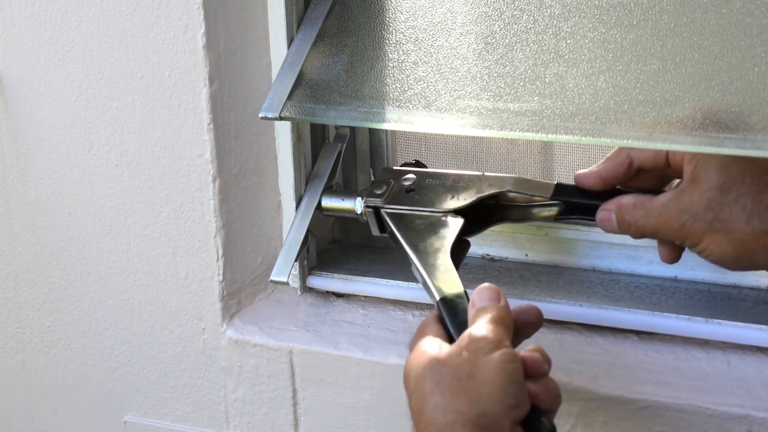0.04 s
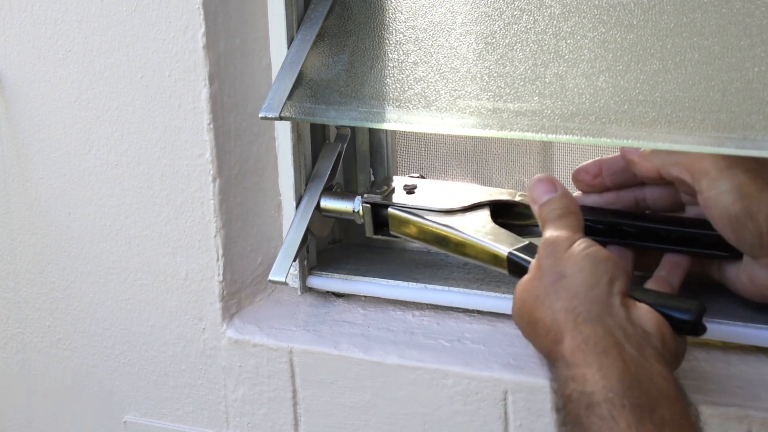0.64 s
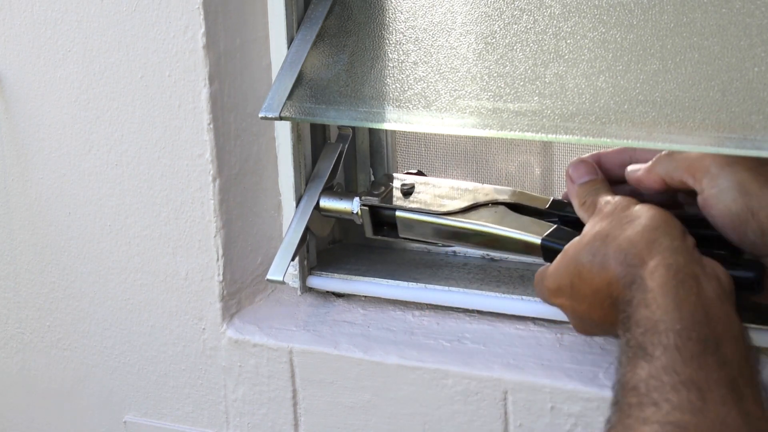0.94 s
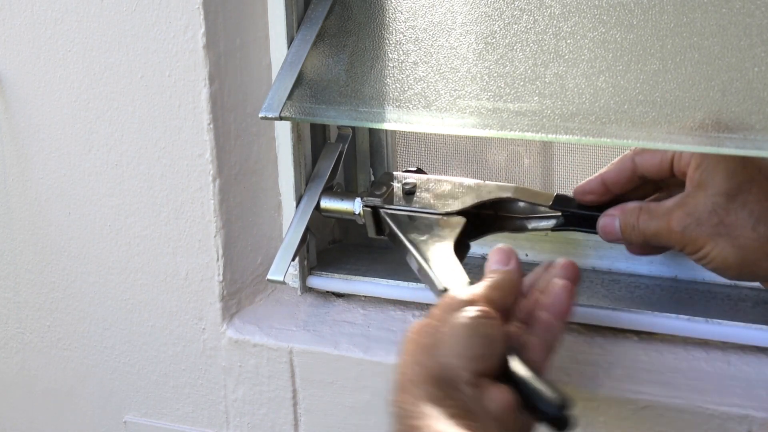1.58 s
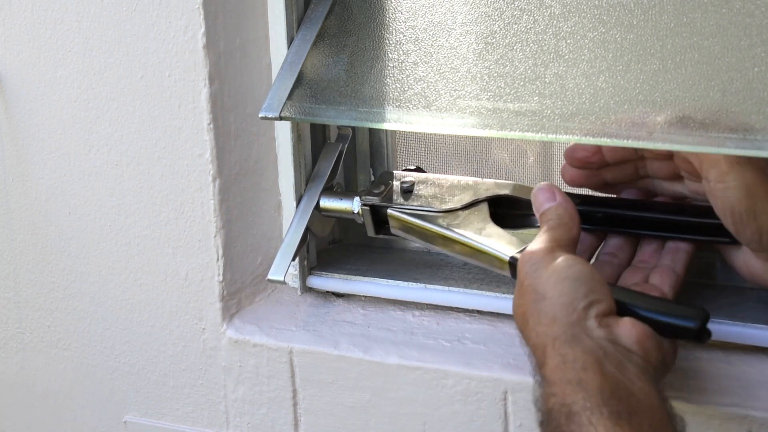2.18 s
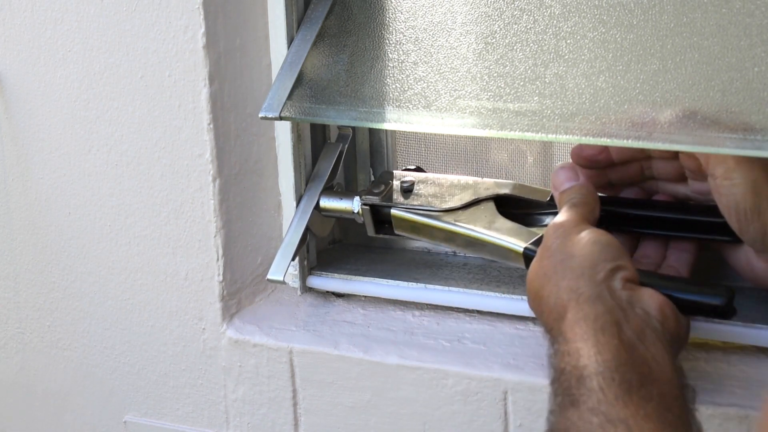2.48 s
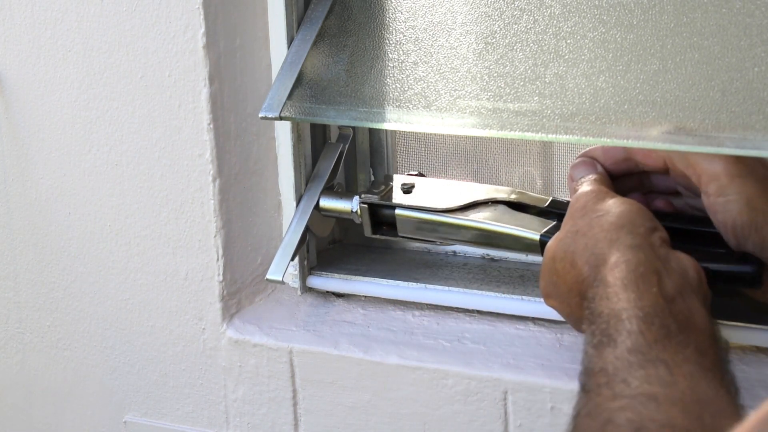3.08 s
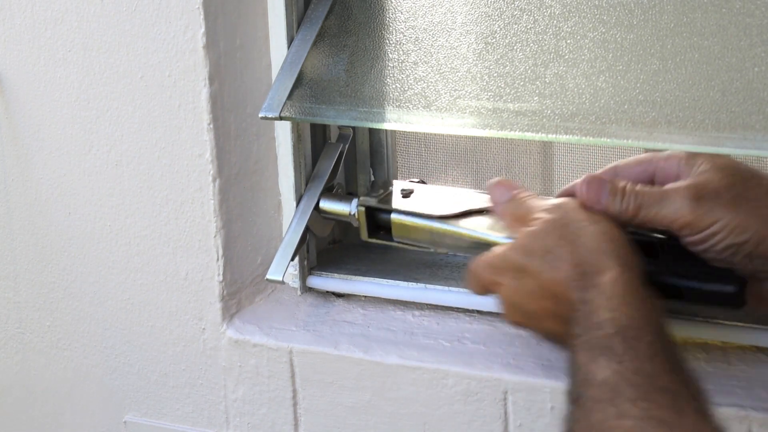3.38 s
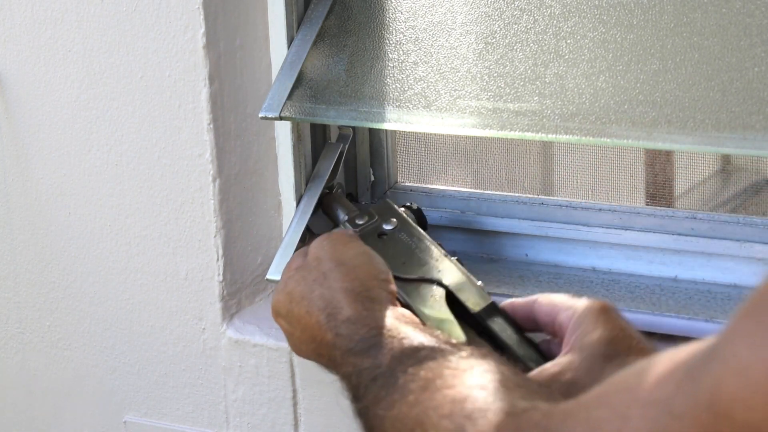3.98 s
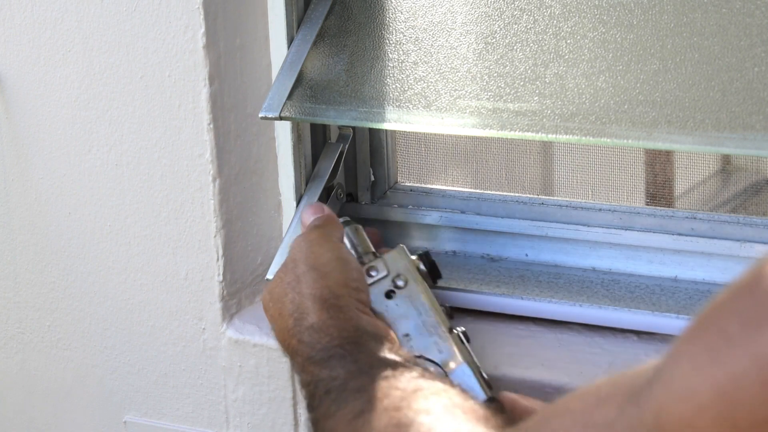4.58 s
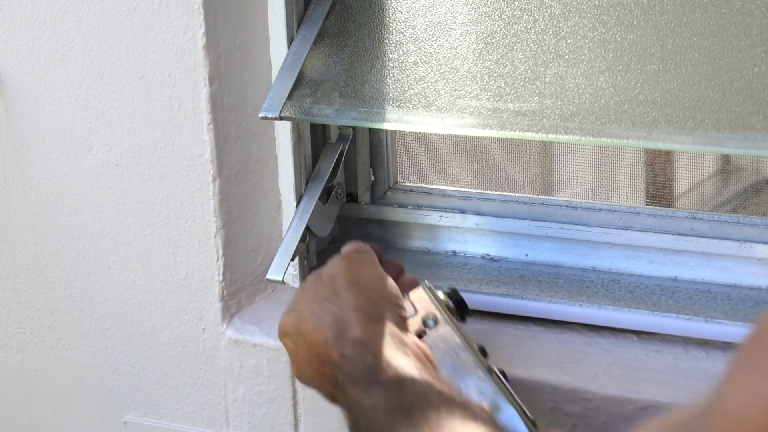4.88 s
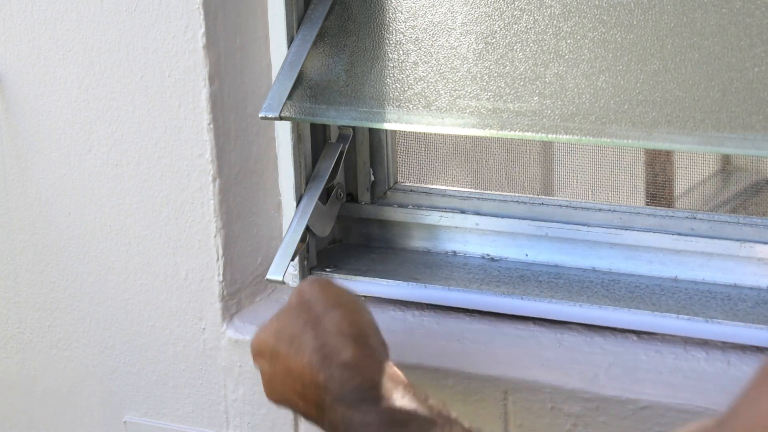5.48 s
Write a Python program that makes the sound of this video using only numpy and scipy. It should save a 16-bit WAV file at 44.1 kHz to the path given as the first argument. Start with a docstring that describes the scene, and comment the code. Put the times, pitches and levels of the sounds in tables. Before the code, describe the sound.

A hand rivet tool clicks and snaps loudly against an aluminium window frame, then scrapes and rattles away over faint traffic.

```python
"""A small hard room with an aluminium louvre window; distant traffic hums outside.
Close up, a hand rivet tool is pumped twice against the window, its steel jaws and handles clicking.
The mandrel snaps with a bang that rings the frame and overloads the microphone, then the tool is
drawn off, scraping and rattling. Near the end an engine swells and a faint whistle sounds far away."""
import sys
import numpy as np
from scipy import signal
from scipy.fft import rfft, irfft
from scipy.io import wavfile
from scipy.ndimage import uniform_filter1d

SR = 44100
rng = np.random.default_rng(int(sys.argv[2]) if len(sys.argv) > 2 else 0)


def put_to_file(sound):
    """Save the sound as 16-bit audio at rate SR, in the file named by the first command-line argument."""
    columns = np.atleast_2d(sound).T  # one column per channel
    safe = np.clip(columns, -1, 1)
    whole_steps = np.round(safe * 32767)
    wavfile.write(sys.argv[1], SR, whole_steps.astype(np.int16))


N = 253021
TAPS = 4096  # length of the colouring filters
BINS = np.fft.rfftfreq(TAPS, 1 / SR)


def amp(db):
    """Decibels to gain."""
    return 10 ** (np.asarray(db) / 20)


def unit(x):
    """Scales to rms 1."""
    return x / np.sqrt(np.mean(x ** 2) + 1e-20)


def curve_at(points, hz):
    """Reads a table on a log-frequency axis."""
    f, value = np.transpose(points)
    return np.interp(np.log(hz + 1), np.log(f + 1), value)


def add(mix, start_s, sound):
    """Drops a sound into the mix."""
    part = mix[:, max(round(start_s * SR), 0):][:, :sound.shape[-1]]
    part += sound[..., :part.shape[-1]]


def equalised(x, points):
    """EQs a whole track by a table of dB."""
    return irfft(rfft(x) * amp(curve_at(points, np.fft.rfftfreq(N, 1 / SR))), N)


def coloured(x, db):
    """Minimum-phase EQ: resonances ring after the blow, never before."""
    log_gain = np.log(amp(np.maximum(db, -100)))
    mirrored = np.r_[log_gain, log_gain[-2:0:-1]]
    taps = np.fft.ifft(np.exp(np.conj(signal.hilbert(mirrored)))).real
    return signal.fftconvolve(x, taps[None], axes=1)


def drift(rate_hz):
    """A slow random wobble of rms 1."""
    hz = np.fft.rfftfreq(N, 1 / SR)
    return unit(irfft(rfft(rng.standard_normal(N)) * np.exp(-(hz / rate_hz) ** 2), N))


# The rumble of far roads. Each row: frequency in Hz, relative level in dB.
TRAFFIC_EQ = [(15, -50), (27, -23), (42, -2.5), (64, -11), (88, 0), (132, -6.5), (165, -2), (220, -1),
              (280, -9.5), (450, -15.5), (620, -16.5), (860, -10), (1600, -13.5), (2500, -24),
              (4470, -35.5), (9000, -45.5), (15900, -51.5)]
# Its stereo spread. Each row: frequency in Hz, side against mid in dB.
TRAFFIC_WIDTH = [(60, -20.5), (110, -25.5), (200, -32), (380, -25), (700, -24), (1290, -19.5), (2380, -14),
                 (4400, -9), (8120, -13.5), (15000, -21)]


def traffic(start_db=-40, sink_db=4, sink_s=2.2, flutter_db=.5):
    """A wash of road noise that sinks as the traffic draws away, as mid and side."""
    t = np.arange(N) / SR
    level_db = start_db - sink_db * (1 - np.exp(-t / sink_s)) + flutter_db * drift(10.3)
    wash = unit(equalised(rng.standard_normal((2, N)), TRAFFIC_EQ)) * amp(level_db)
    return widened(wash, TRAFFIC_WIDTH)


def engine(firing_hz=97.8, idle_db=-51, waver=.015, throb_db=3, surge_s=4.92, surge_width_s=.26):
    """A distant engine idles, wavering around its firing rate, and grows louder for a moment."""
    t = np.arange(N) / SR
    cycles = firing_hz * np.cumsum(1 + waver * drift(6)) / SR
    hum = sum(amp(db + throb_db * drift(9.2)) * np.sin(2 * np.pi * order * cycles)
              for order, db in ((.5, -7), (1, .004), (2, -7)))
    surge_db = 7.5 * np.exp(-((t - surge_s) / surge_width_s) ** 2)
    return amp(idle_db + surge_db) * hum


def whistle(start_s=5.28, length_s=.3, hz=4910, level_db=-73, flicker_db=3, ramp_s=.04):
    """A thin, flickering tone far off swells and fades once."""
    t = np.arange(N) / SR - start_s
    swell = np.clip(np.minimum(t, length_s - t) / ramp_s, 0, 1)
    return swell * amp(level_db + flicker_db * drift(25)) * np.sin(2 * np.pi * hz * t)


# The hard room's reverb. Each row: frequency in Hz, seconds to fall 60 dB.
ROOM_T60 = [(150, 0.18), (500, 0.5), (1500, 0.47), (3000, 0.48), (5500, 0.48), (8000, 0.45816),
            (12000, 0.34), (16000, 0.22)]


def room_decay(recess_db, recess_t60=.105):
    """Gain over frequency and time: the window recess dies fast, the room behind it slowly."""
    hz, t, _ = signal.stft(np.zeros(SR // 2), SR, nperseg=256)
    room = amp(-60 * t / curve_at(ROOM_T60, hz)[:, None])
    recess = amp(recess_db - 60 * t / recess_t60)
    return np.hypot(room, recess)


def reflections(decay, build_s=.0024):
    """A fresh tail of dense wall reflections, as mid and side."""
    spectrogram = signal.stft(rng.standard_normal((2, SR // 2)), SR, nperseg=256)[2]
    tail = signal.istft(spectrogram * decay, SR, nperseg=256)[1]
    tail *= 1 - np.exp(-np.arange(tail.shape[1]) / SR / build_s)
    return tail / np.linalg.norm(tail[0])


# Stereo spread of the tool in the room. Each row: frequency in Hz, side gain in dB.
TOOL_WIDTH = [(100, -28), (1200, -34.5), (2200, -25.5), (3300, -18), (5000, -14), (7000, -5.5),
              (8200, -6.5), (10000, -11.5), (14000, -6.5)]


def widened(x, width=TOOL_WIDTH):
    """Sets the side against the mid, band by band."""
    return np.array([x[0], equalised(x[1], width)])


# The aluminium frame with the tool on it.
# Each row: pitch in Hz, relative level in dB, seconds to fall 60 dB.
FRAME_MODES = [(404, -10.5, 0.496), (1550, 1, 0.59), (1466, 3, .4), (1530, 1, 0.26), (1650, -6.5, 0.56),
               (1850, -7.5, 0.507), (2050, -4, 0.5), (2150, -7.5, .3), (2260, -6.5, 0.29), (2080, -9, 0.26),
               (2410, -3, .38), (2680, -8, .55), (2673.4, -4, 0.45), (2750, -0.5, 0.324),
               (3095, -2.5, 0.31), (3352, -5, .3), (3370, -2.5, .42), (3700, -5.5, 0.26), (4170, -1, 0.33),
               (5360, -4.5, .3), (5530, -3, .3), (5950, 6.5, 0.2303), (6200, -5, 0.22), (9300, -7, 0.27),
               (9160, 0, 0.237), (12067, -1.5, 0.18)]


def frame_ring(length_s=.5, attack_s=.001):
    """The frame's modes ring down after one blow, as mid and side."""
    t = np.arange(round(length_s * SR)) / SR
    phases = rng.uniform(0, 2 * np.pi, (len(FRAME_MODES), 2, 1))
    modes = sum(amp(db - 60 * t / t60) * np.sin(2 * np.pi * hz * t + phase)
                for (hz, db, t60), phase in zip(FRAME_MODES, phases))
    return modes * (1 - np.exp(-t / attack_s))


def tilt(db_per_octave):
    """A slope in dB, pivoting at 3 kHz: harder contacts are brighter."""
    return db_per_octave * np.log2(np.maximum(BINS, 800) / 3000)


def mode_ripple(spacing_hz=110):
    """Uneven peaks and dips of rms 1, from the steel's many close modes."""
    knots = np.arange(0, SR / 2, spacing_hz)
    heights = rng.uniform(-.89, 1, TAPS)[:len(knots)]
    return unit(np.interp(BINS, knots, heights))


def blow(decay_s, rise_share=.237):
    """A noise burst for dense, quickly damped metal modes; mid and side each have energy 1."""
    t = np.arange(TAPS // 2) / SR
    spectrum = rfft(rng.standard_normal((2, TAPS)))
    spectrum /= np.sqrt(uniform_filter1d(abs(spectrum) ** 2, size=40, axis=1))  # feed all bands alike
    envelope = np.exp(-t / decay_s) * (1 - np.exp(-t / (rise_share * decay_s)))
    burst = irfft(spectrum)[:, :len(t)] * envelope
    return burst / np.linalg.norm(burst, axis=1, keepdims=True)


def metal_hits(rows, eq, peak_width_share, recess_db, ripple_db, ping_db, ping_t60=.057):
    """Direct sound and reflections of metal striking metal; each hit favours one resonance."""
    direct, reflected = np.zeros((2, N)), np.zeros((2, N))
    decay = room_decay(recess_db)
    body_db = curve_at(eq, BINS) + ripple_db * mode_ripple()
    t = np.arange(TAPS) / SR
    for start_s, level_db, hz, peak_db, brightness, decay_s in rows:
        excess = max(amp(peak_db) ** 2 - 1, 0)
        resonance = 1 + excess / (1 + ((BINS - hz) / (peak_width_share * hz)) ** 2)
        # the more a hit rings on one note, the softer its top
        cutoff_hz = max(17500 * 2 ** (-.08 * peak_db), 1.5 * hz)
        rolloff = 1 + (BINS / cutoff_hz) ** 8
        colour_db = body_db + tilt(brightness) + 10 * np.log10(resonance / rolloff)
        # the level is the blow's energy spread over 10 ms
        gain = amp(level_db) * np.sqrt(SR / 100 / np.mean(amp(colour_db) ** 2))
        add(direct, start_s, gain * coloured(blow(decay_s), colour_db))
        add(reflected, start_s, gain * coloured(reflections(decay), colour_db))
        # the favoured mode rings on as a short, centred ping
        ping = amp(level_db + ping_db - 60 * t / ping_t60) * np.sin(2 * np.pi * hz * t)
        add(direct[:1], start_s, np.sqrt(excess / (excess + 20)) * ping)
    return direct, reflected


# The steel tool's tone, in scrapes and clicks alike. Each row: frequency in Hz, gain in dB.
STEEL_EQ = [(100, -6), (500, -10.5), (1000, 0), (1600, 7), (2200, 4.5), (3000, 0.5), (3550, 1), (4200, -5),
            (5000, -7.5), (6000, -9), (8500, -9), (11500, -13), (15500, -15)]
# Steel sliding on metal.
# Each row: start in seconds, length in seconds, level in dB, brightness in dB per octave.
SCRAPE_STROKES = [(0.205, 0.026, -52.5, 0.5), (1.18, 0.035, -55.5, -1), (1.358, 0.087, -55, -2),
                  (2.42, 0.024, -58, -0.5), (3.641, .03, -48.5, -3.5), (3.74, 0.13, -50, -4),
                  (3.875, 0.054, -52, 1), (4.281, 0.066, -61, -2), (4.376, 0.03, -54, -1.5),
                  (4.561, 0.21, -64.5, 2), (5.039, 0.067, -59.5, -0.5)]


def tool_scrapes(slips_per_s=1100, room_db=-4):
    """The tool slides in many tiny slips, each stroke swelling and fading."""
    direct = np.zeros((2, N))
    for start_s, length_s, level_db, brightness in SCRAPE_STROKES:
        n = round(length_s * SR)
        slips = rng.standard_normal((2, n)) * (rng.random(n) < slips_per_s / SR) * np.hanning(n)
        stroke = coloured(slips, curve_at(STEEL_EQ, BINS) + tilt(brightness))[:, :n]
        add(direct, start_s, amp(level_db) * unit(stroke))
    reflected = signal.fftconvolve(direct, reflections(room_decay(recess_db=-9)), axes=1)[:, :N]
    return widened(direct + amp(room_db) * reflected)


# Knocks inside the tool. Each row: start in seconds, level in dB, resonance in Hz,
# its peak in dB, brightness in dB per octave, decay time in seconds.
TOOL_KNOCKS = [(0.006, -46, 3260, 15, 1, 0.0024), (0.263, -36.5, 3520, 8, -0.5, 0.0037),
               (0.9649, -32.5, 2200, 12, 2, .004), (0.9668, -37, 5200, 8, -1, 0.016),
               (1.203, -47.5, 6630, 9, -1, .006), (1.369, -34, 3480, 14, -1, 0.0022),
               (1.3965, -45, 3213, 6, -1, .0037), (1.405, -31, 1300, 11, -6, .004),
               (1.4205, -28, 1810, 1, -2, .0018), (1.422, -44.5, 14670, 12, 4, .0013),
               (1.427, -36.5, 2160, 10, -3.5, 0.006), (1.499, -46, 2500, 3, -3, 0.0022),
               (1.652, -53, 3760, 14, 2.5, .002), (1.7021, -37, 7500, 6.5, 0, 0.0043),
               (1.713, -35.5, 10750, 4, -0.5, 0.0022), (1.954, -44.5, 3040, 2, -8, 0.0037),
               (3.6563, -42.5, 3020, 6, -3, .008), (3.9083, -39, 6650, 9, .5, 0.009),
               (3.9125, -36, 1150, 7, 1.5, .004), (3.9199, -37.5, 7100, 12, -.5, 0.013),
               (4.095, -50, 2490, 2, -3, .004), (4.495, -41, 12400, -2, 7, 0.0015),
               (4.5727, -45, 3009, 6, 6, 0.0018), (4.6144, -52.5, 12000, 2, 5, .002)]


def tool_clicks(ring_db=-32, room_db=-2.5, side_db=-4):
    """Jaws, pivot and handles knock; bright knocks stir the frame less than dull ones."""
    direct, reflected = metal_hits(TOOL_KNOCKS, STEEL_EQ, peak_width_share=.074,
                                   recess_db=12, ripple_db=3.5, ping_db=4)
    ring = frame_ring()
    for start_s, level_db, _, _, brightness, _ in TOOL_KNOCKS:
        add(direct, start_s, amp(level_db + ring_db - 2 * max(brightness, 0)) * ring)
    mid, side = widened(direct + amp(room_db) * reflected)
    return np.array([mid, amp(side_db) * side])


# The mandrel breaks in stages, then the jaws slam back. Each row: start in seconds, level in dB,
# resonance in Hz, its peak in dB, brightness in dB per octave, decay time in seconds.
SNAP_HITS = [(3.0663, -14.5, 700, 14, 0, 0.0017), (3.0689, -7.5, 2224, 3.5, 0, 0.00387),
             (3.0722, -10, 3380, 4, 0.5, .005), (3.0810, -17.5, 4500, 3.5, 1, .005),
             (3.0875, -15, 9600, 10, 2.5, .006)]
# The tone of the break. Each row: frequency in Hz, gain in dB.
SNAP_EQ = [(60, -18), (270, -9.5), (480, -16.5), (750, -10), (1200, -10), (1520, 2), (2000, -9.5),
           (2290, 4.5), (2600, -5.5), (3400, -2), (4300, -8), (7000, -9.5), (8000, -19.5), (15500, -13.5)]
# The bang spreads much wider than the clicks. Each row: frequency in Hz, side gain in dB.
SNAP_WIDTH = [(50, 2.5), (200, -10.5), (450, -8), (900, -8.5), (2200, -17.5), (3300, -11), (5000, -11.5),
              (6000, -4), (8200, 10), (10000, -1.5), (12000, -4), (14500, -9.5)]


def mandrel_snap(ring_db=-28.5, room_db=-9, kick_s=3.0676, kick_hz=250, kick_db=-6, kick_decay_s=.0017):
    """The mandrel breaks; the freed tension kicks the frame and sets it ringing."""
    direct, reflected = metal_hits(SNAP_HITS, SNAP_EQ, peak_width_share=.17,
                                   recess_db=-10, ripple_db=1, ping_db=-10)
    t = np.arange(TAPS) / SR
    kick = amp(kick_db) * np.sin(2 * np.pi * kick_hz * t) * np.exp(-t / kick_decay_s)
    add(direct, kick_s, kick)
    tail = amp(room_db) * reflected
    add(tail, kick_s, amp(ring_db) * frame_ring())
    return widened(direct, SNAP_WIDTH) + widened(tail)


def scene():
    """Tool and traffic go from mid and side to left and right; engine and whistle sit dead centre."""
    mid, side = tool_clicks() + tool_scrapes() + mandrel_snap() + traffic()
    return np.array([mid + side, mid - side]) + engine() + whistle()


def record(dry):
    """The bang overloads the microphone into soft clipping; a steep low-pass trims the top."""
    clipped = dry / (1 + dry ** 8) ** (1 / 8)
    lowpass = signal.firwin(511, 15830, window=("kaiser", 9), fs=SR)
    return signal.oaconvolve(clipped, lowpass[None], "same")


dry = scene()
out = record(dry)
put_to_file(out)
```